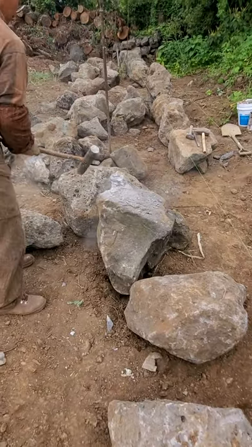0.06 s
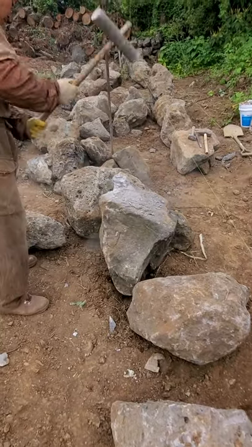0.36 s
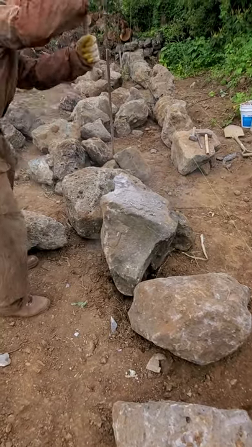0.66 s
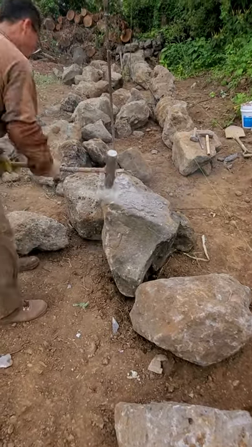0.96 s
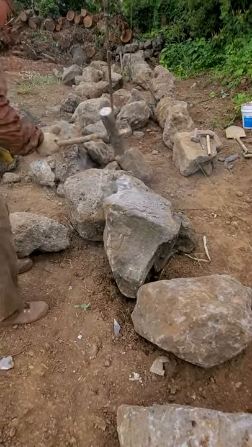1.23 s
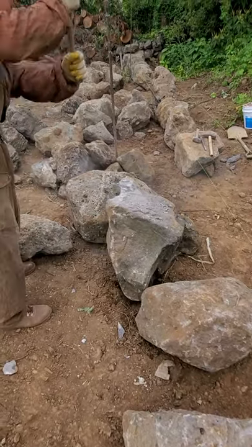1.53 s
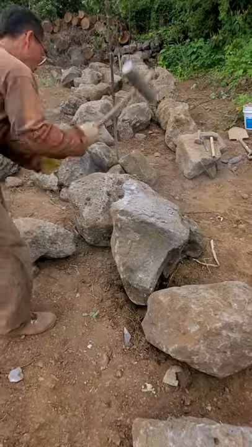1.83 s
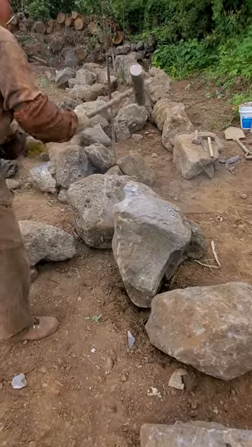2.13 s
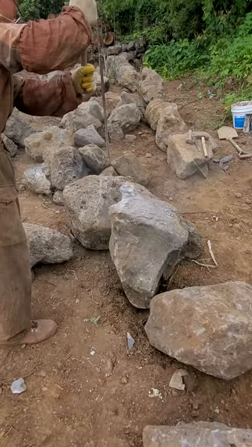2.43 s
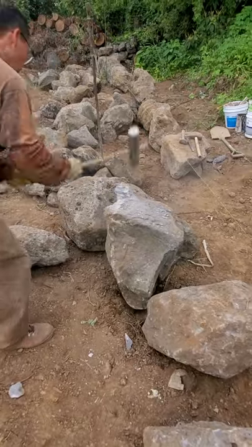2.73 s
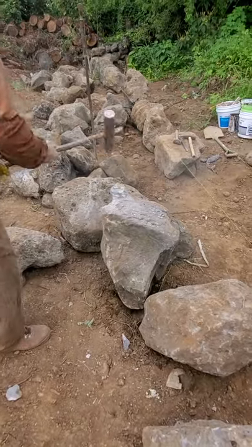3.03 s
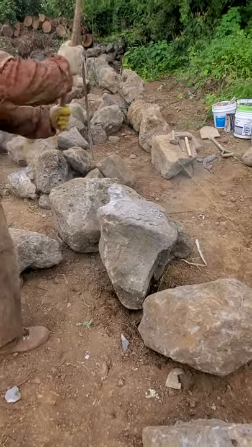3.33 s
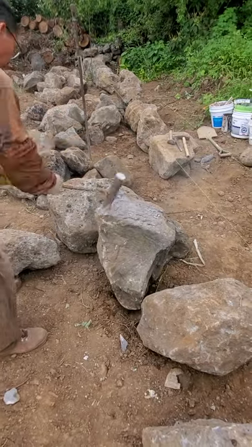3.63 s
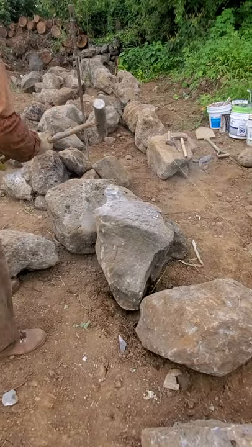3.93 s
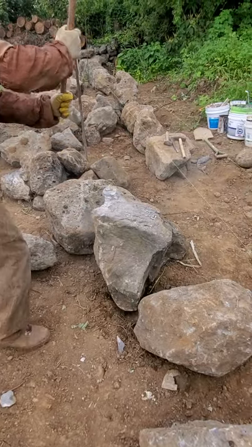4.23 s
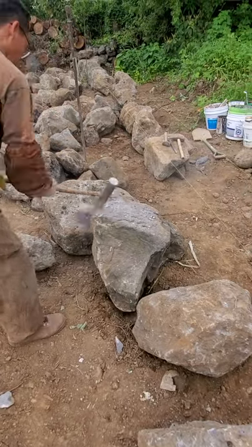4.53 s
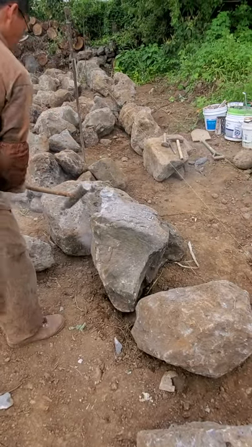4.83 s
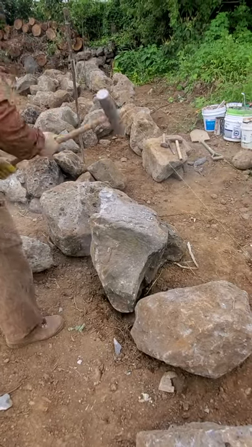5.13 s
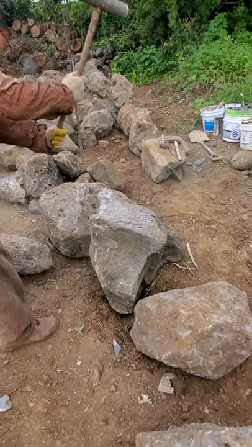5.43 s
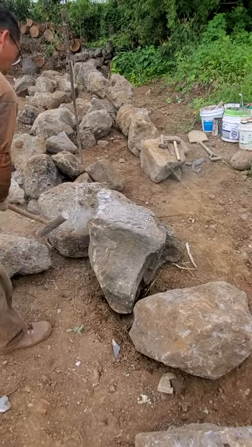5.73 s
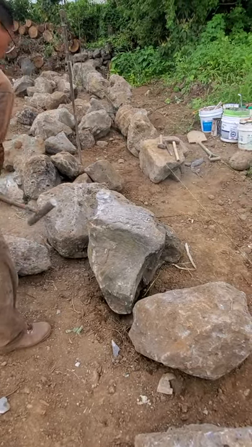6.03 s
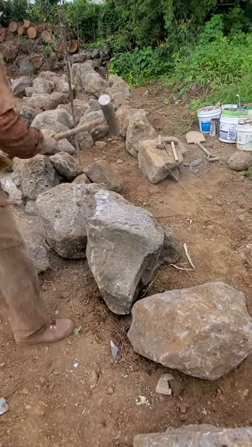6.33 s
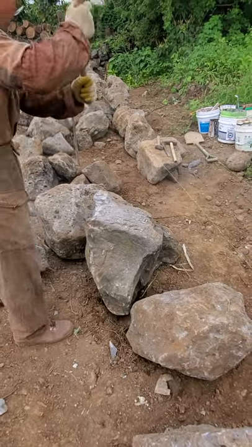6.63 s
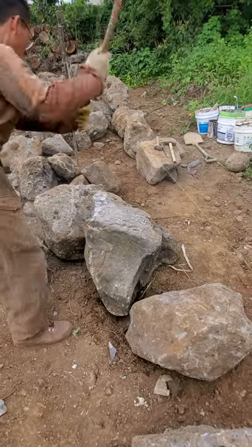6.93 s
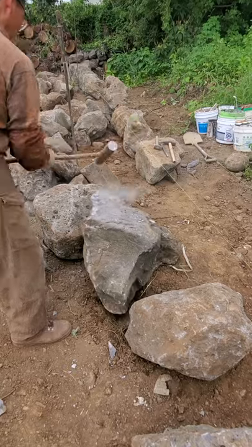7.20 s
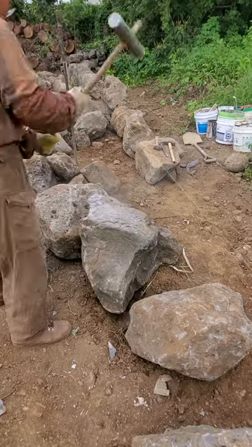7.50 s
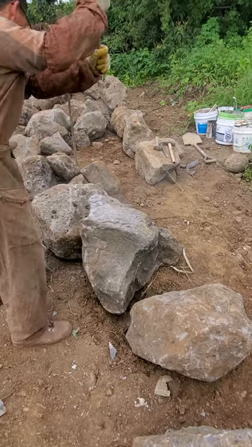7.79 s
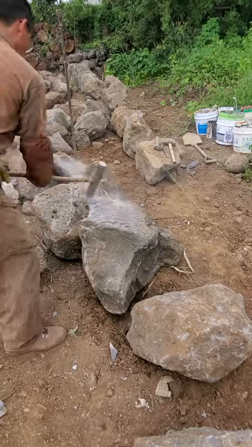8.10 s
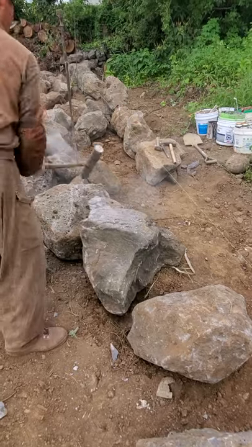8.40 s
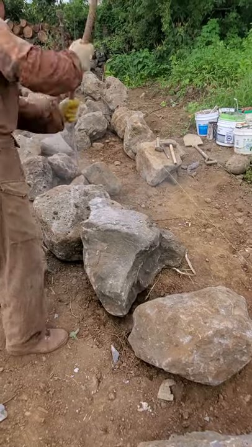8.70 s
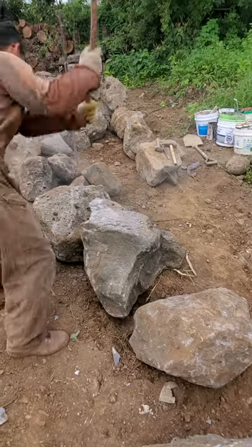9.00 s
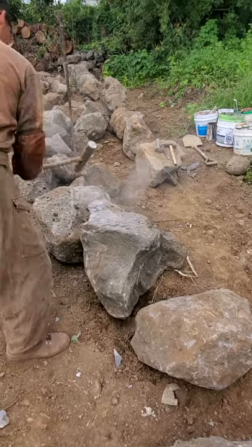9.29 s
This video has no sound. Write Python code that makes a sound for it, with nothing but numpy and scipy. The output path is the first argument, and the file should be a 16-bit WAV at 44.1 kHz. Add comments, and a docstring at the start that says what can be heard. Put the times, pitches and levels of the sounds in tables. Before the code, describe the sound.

Steady metallic hammer blows crack against stone and echo around a yard, while chips patter down over a low, far engine hum.

```python
"""A yard between two walls, stereo microphone near a boulder, an engine rumbling in the distance. At first
stone chips and grit are still falling. From one second in, a sledgehammer strikes a hand-held steel chisel nine
times: the boulder thuds and cracks, the steel rings, the walls throw the sound back and forth, and grit patters
down. Between swings clothes rustle, boots shift on the dirt and a far bird whistles faintly. Toward the end the
grit falls louder and the engine's hum grows louder."""
import sys
import numpy as np
from scipy import signal
from scipy.fft import rfft, irfft, next_fast_len
from scipy.io import wavfile

SR = 44100
rng = np.random.default_rng(int(sys.argv[2]) if len(sys.argv) > 2 else 0)


def inscribe(sig):
    """Save sig as 16-bit PCM at rate SR to the path in sys.argv[1].

    A 1-D sig is mono; a 2-D sig holds one channel per row.
    Samples are clipped to [-1, 1] before scaling.
    """
    pcm = np.round(np.clip(np.atleast_2d(sig).T, -1, 1) * 32767)
    wavfile.write(sys.argv[1], SR, pcm.astype(np.int16))


N = 412335
TIME = np.arange(N) / SR

# the far engine's hum level, rising unevenly: (time [s], hum level [dB])
HUM_LEVEL = [(0.0, -65), (0.68, -74), (1.07, -57), (2.42, -70.5), (7.37, -46), (7.6, -49.5),
             (8.28, -47), (8.39, -48), (9.35, -48)]
# spectra of low rumble, distant traffic and airy hiss: (frequency [Hz], level [dB])
RUMBLE_SPECTRUM = [(20, -16.5), (32, -14), (48, -2.5), (64, 0.5), (80, -1.5), (105, -3), (150, -11.5),
                   (260, -15.5), (600, -60)]
TRAFFIC_SPECTRUM = [(90, -6), (170, 4), (280, 4.5), (450, -1), (1000, -3), (1500, -7.5), (2000, -17.5),
                    (2700, -29.5), (4500, -42)]
AIR_SPECTRUM = [(1500, -3.5), (3000, 14), (4800, 4), (6200, 11.5), (7500, 2), (12000, -6), (16000, -14)]
# a far bird: (time [s], length [s], first pitch [Hz], last pitch [Hz], level [dB])
BIRD_CALLS = [(1.42, 0.069, 5240, 3800, -71), (6.42, 0.26, 3650, 3790, -80), (6.68, .2, 4090, 4660, -79),
              (7.59, 0.056, 5120, 3800, -62)]
# spectra of the wall echoes and of the scatter from rocks and trees: (frequency [Hz], level [dB])
WALL_SPECTRUM = [(100, -8.5), (300, -12), (600, -1.5), (1300, 0), (2100, -5), (3000, 2), (6000, -6),
                 (10000, -6), (16000, -17.5)]
SCATTER_SPECTRUM = [(100, 1), (300, -12.5), (600, -7.5), (1300, -5), (3000, -5), (6000, -4.5), (10000, -9),
                    (16000, -2)]
# single reflections from the ground and from nearby rocks: (delay [s], level [dB], left minus right [dB])
NEAR_REFLECTIONS = [(.0075, -10, -3), (0.058, -26, -4.5), (0.08, -26.5, -3)]
# the body shifting between swings, and boots scuffing: (time [s], half-width [s], level [dB])
BODY_SHIFTS = [(0.106, 0.34, -52.5), (5.55, 0.033, -49.5), (6.758, 0.071, -43.5), (7.465, 0.086, -46)]
BOOT_SCUFFS = [(1.582, 0.019, -50), (6.344, 0.013, -51)]
# spectra of work clothes, scuffed dirt and falling grit: (frequency [Hz], level [dB])
CLOTH_SPECTRUM = [(100, -11), (200, 5.5), (300, 6.5), (500, -2.5), (900, -10.5), (2000, -20), (6000, -60),
                  (16000, -58)]
SCUFF_SPECTRUM = [(200, 6), (700, 3.5), (1800, 2), (2500, -8), (3600, -19), (16000, -43)]
GRIT_SPECTRUM = [(400, -11), (1200, -0.5), (3000, -1.5), (8000, -3.5), (12000, -7.5), (16000, -9.5)]
# boots and lumps landing on the dirt: (time [s], level [dB])
DIRT_LANDINGS = [(0.068, -30.5), (0.151, -42), (0.192, -41), (0.502, -43.5), (5.219, -32.5), (5.233, -35.5),
                 (7.543, -43.5), (7.568, -39.5)]
# larger chips landing: (time [s], pitch [Hz], level [dB], contact hardness [dB])
CHIP_LANDINGS = [(0.0222, 1680, -28.5, -5), (0.0683, 1280, -33, 3), (0.1446, 2150, -42, 7),
                 (0.168, 1650, -37, 9), (0.172, 1304, -37.5, 12), (0.2116, 1047, -37, -11),
                 (0.2769, 1427, -35, -30), (0.3006, 1900, -52.5, 3), (0.3406, 1740, -52.5, 7),
                 (0.4688, 1388, -40, -16.5), (0.537, 1767, -62.5, 1), (4.787, 1110, -53, 10),
                 (4.824, 1367, -55.5, 10.5), (4.8674, 935, -31, -6), (4.892, 1170, -35.5, 6),
                 (5.1407, 965, -68.5, 17.5), (5.263, 1480, -51.5, -5.5), (5.861, 1750, -54.5, 11),
                 (5.927, 1330, -44, 3), (7.6742, 1860, -46.5, 15.5), (8.489, 1160, -73, 24),
                 (8.8895, 1243, -57.5, -0.5)]
# resonances of a chip's body: (multiple of its pitch [ratio], width [Hz], level [dB])
CHIP_BODY_MODES = [(.6, 366, -2.5), (0.949, 220, -2), (1.251, 262, -2)]
# resonances of a chip's clack and tick, and of the dirt: (frequency [Hz], width [Hz], level [dB])
CHIP_CLACK_MODES = [(2830, 680, -5), (3750, 1500, -5), (5325, 220, -4)]
CHIP_TICK_MODES = [(6450, 4500, 0.5), (8900, 1200, -6.5), (13200, 1900, -6.5)]
DIRT_MODES = [(150, 46, 2), (277.6, 98.5, 0), (405, 250, -12.5)]
# modes of hammer head and chisel: (voice, frequency [Hz], level [dB], t60 [s], share of the voice's
# level [ratio], share of the force [ratio], swell as the head turns [dB], left minus right [dB])
STEEL_MODES = [("clang", 3390, -19.5, .17, 1, 0, 0, -5.5), ("ping", 4216, -26.5, 0.11, .25, .05, 3, -.5),
               ("ring", 6515, -57.5, 1.3, 0.33, .65, 10.5, -7), ("ping", 8578, -41, .21, 0.99, .15, 21, -1),
               ("ring", 8700, -53, .2, .7, .3, -1.5, 2.5), ("ring", 9878, -47, 0.55, 0.98, .5, 20.4, 2.4)]
# resonances of the boulder under the chisel, low to high: (frequency [Hz], width [Hz], level [dB])
THUD_MODES = [(239, 17, 2), (265.8, 23, 2.5), (315.6, 69, -7.5)]
KNOCK_MODES = [(406, 100, -4.5), (565, 110, 0), (730, 200, -1.5), (1010, 470, -1.5)]
CRACK_MODES = [(1315, 330, 1.5), (1610, 130, -1), (2008, 150, 1), (2720, 680, -7.5), (3450, 1200, -3)]
SPLINTER_MODES = [(4800, 530, -1), (6190, 240, 4.5), (8240, 550, -8.5), (11600, 4100, -13),
                  (14000, 2000, -14)]
# hammer blows; force and the steel's three voices (set by where the head meets the chisel) are
# relative to a usual blow:
# (time [s], force [dB], thud [dB], knock [dB], crack centre [Hz], clang [dB], ping [dB], ring [dB])
HAMMER_BLOWS = [(0.9690, -15.5, -15, -24, 1716, 5.5, -1.5, -1.5),
                (1.9495, 2.5, -17, -24.5, 1870, -2.5, 0, 3.5),
                (2.8177, -2, -16, -18, 1750, -25.5, -0.5, -14),
                (3.6893, -3.5, -18.5, -18.5, 1940, -0.5, -20.5, -7),
                (4.578, -4.5, -24, -16.5, 2220, 7.5, 3, 3), (5.681, -2, -27, -23.5, 2180, -2.5, 8.5, -2.5),
                (7.124, 5, -16, -21, 1750, -4, 1, 14), (8.114, 4, -18.5, -24.5, 1520, 4.5, 8.5, 3.5),
                (9.194, 3, -20, -27, 2066, -4.5, 18, -7.5)]


def from_db(db):
    """Decibels to gain."""
    return 10 ** (np.asarray(db) / 20)


def rms_one(x):
    """Scale to rms 1."""
    return x / np.sqrt(np.mean(x ** 2) + 1e-20)


def pan(db):
    """Channel gains for a level difference, left minus right."""
    return rms_one(from_db([[db / 2], [-db / 2]]))


def add(out, s, sound):
    """Mix a sound in at s seconds."""
    at = max(0, round(s * SR))
    out[:, at:at + sound.shape[-1]] += sound[..., :N - at]


def swell(s, half_width_s, db):
    """A bell-shaped rise and fall in level, peaking at s seconds."""
    return from_db(db) * np.exp(-((TIME - s) / half_width_s) ** 2 / 2)


def colour(x, spectrum):
    """Filter by a curve of (frequency [Hz], level [dB])."""
    hz, db = np.transpose(spectrum)
    size = next_fast_len(x.shape[-1])
    grid = np.maximum(np.fft.rfftfreq(size, 1 / SR), 1)
    gain = from_db(np.interp(np.log(grid), np.log(hz), db))
    return irfft(rfft(x, size) * gain, size)[..., :x.shape[-1]]


def stereo_noise(size, width):
    """White noise; width 0 is the same in both channels, 1 unrelated."""
    mid, side = rng.standard_normal((2, size))
    return mid + width * side * np.array([[1], [-1]])


def noise_bed(spectrum, width):
    """Steady coloured stereo noise at rms 1."""
    return rms_one(colour(stereo_noise(N, width), spectrum))


def resonate(x, modes, pitch=1):
    """Parallel resonances with alternating signs."""
    out = 0
    for k, (hz, width, db) in enumerate(modes):
        radius = np.exp(-np.pi * width / SR)
        angle = 2 * np.pi * min(hz * pitch / SR, .45)
        ringing = signal.lfilter([1, 0, -1], [1, -2 * radius * np.cos(angle), radius ** 2], x)
        out = out + (-1) ** k * from_db(db) * (1 - radius ** 2) * ringing
    return out


def burst_at(sound, db):
    """Give a short sound the energy of 20 ms at an rms level of db."""
    return from_db(db) * rms_one(sound) * np.sqrt(.02 * SR / sound.shape[-1])


def background(hum_hz=80.38, hum_width_hz=1.3, shudder_db=-25, shudder_s=0.18):
    """A far engine hums over rumble, distant traffic and faint air; the ground shudders at each thud."""
    hum_db = np.interp(TIME, *np.transpose(HUM_LEVEL))
    hum_swing_db = hum_db - hum_db.mean()   # rumble and traffic rise with the engine
    thuds = np.zeros(N)
    for s, _, thud_db, *_ in HAMMER_BLOWS:
        thuds[round(s * SR)] = from_db(thud_db + shudder_db)
    shudder = signal.lfilter([1], [1, -np.exp(-1 / (shudder_s * SR))], thuds)
    rumble = np.hypot(from_db(-53 + .38 * hum_swing_db), shudder) * noise_bed(RUMBLE_SPECTRUM, width=0.11)
    traffic = from_db(-56 + .25 * hum_swing_db) * noise_bed(TRAFFIC_SPECTRUM, width=0.55)
    air = from_db(-97) * noise_bed(AIR_SPECTRUM, width=1.0)
    band = [(hum_hz, hum_width_hz, 0)]
    wavering = resonate(resonate(rng.standard_normal(N + SR), band), band)[SR:]
    hum = from_db(hum_db) * rms_one(wavering)
    return (rumble + hum + traffic + air) * pan(-1.4)


def bird(waver_hz=110, waver_rate_hz=35):
    """Far from the microphone, a bird's thin gliding whistles waver and break up."""
    out = np.zeros((2, N))
    smooth = signal.butter(2, waver_rate_hz, fs=SR, output="sos")
    for s, length, first_hz, last_hz, db in BIRD_CALLS:
        size = int(length * SR)
        waver, strength = rms_one(signal.sosfilt(smooth, rng.standard_normal((2, SR))))[:, -size:]
        hz = np.linspace(first_hz, last_hz, size) + waver_hz * waver
        envelope = from_db(db) * np.sin(np.linspace(0, np.pi, size)) * strength
        add(out, s, envelope * np.sin(2 * np.pi * np.cumsum(hz) / SR))
    return out


def yard(x, first_echo_s=.0495, round_trip_s=.0535, trip_loss_db=7.5, smear_s=0.0067, scatter_t60=.66):
    """Sound flutters between two rough walls; the ground and nearby rocks reflect it once, trees add a diffuse
    tail."""
    t, echoes = TIME[:SR], 0
    flutter = [(first_echo_s + k * round_trip_s, -13 - k * trip_loss_db, -2) for k in range(4)]
    for delay, db, side_db in NEAR_REFLECTIONS + flutter:
        age = t - delay
        lead = np.where(age > 0, 1, from_db(-9))   # rocks in front of a wall answer early and weaker
        smear = np.exp(-abs(age) / smear_s) * lead
        echoes = echoes + from_db(db) * pan(side_db) * rms_one(smear * stereo_noise(SR, 0.24))
    build_up = 1 - np.exp(-t / 0.028)
    tail = rms_one(stereo_noise(SR, 0.62) * from_db(-60 * t / scatter_t60) * build_up)
    scatter = from_db(-13.5) * pan(-3.0) * colour(tail, SCATTER_SPECTRUM)
    response = (colour(echoes, WALL_SPECTRUM) + scatter) / np.sqrt(SR)
    return signal.fftconvolve(x, response[:, :SR * 9 // 10], axes=1)[:, :N]


def clothes(swing_lead_s=0.094, swing_half_width_s=0.15):
    """Heavy work clothes swish, a glove hisses along the shaft on each downswing and boots scuff."""
    swings = sum(swell(s - swing_lead_s, swing_half_width_s, force) for s, force, *_ in HAMMER_BLOWS)
    shifts = sum(swell(*shift) for shift in BODY_SHIFTS)
    swish = (shifts + from_db(-60) * swings) * noise_bed(CLOTH_SPECTRUM, width=0.17)
    hiss = (from_db(-32) * shifts + from_db(-74.5) * swings) * noise_bed(AIR_SPECTRUM, width=1.0)
    boots = sum(swell(*scuff) for scuff in BOOT_SCUFFS) * noise_bed(SCUFF_SPECTRUM, width=0.61)
    return (swish + hiss + boots) * pan(-6.0)


def grit(grains_per_s=450, size_db=5, flight_s=0.28, flight_spread=0.62, rise_db_per_s=2.5):
    """Grit thrown up by each blow patters down; the stone loosens, so each shower is louder."""
    showers = [(-0.36, -61)]   # one is already falling at the start
    showers += [(s, -84 + rise_db_per_s * s) for s, *_ in HAMMER_BLOWS]
    level = 0
    for s, db in showers:
        log_age = np.log(np.maximum(TIME - s, 1e-3) / flight_s)
        level = level + from_db(db) * np.exp(-(log_age / flight_spread) ** 2 / 2)
    landings = rng.random(N) < grains_per_s / SR
    grains = landings * from_db(size_db * np.minimum(rng.exponential(1, N), 4))
    rattle = signal.lfilter([1], [1, -np.exp(-1 / (0.0005 * SR))], grains + 1e-18)
    return level * rms_one(colour(rattle * stereo_noise(N, 1), GRIT_SPECTRUM))


def impact(modes, db, crush_s, width, top_hz, snap, detune=0.065, crumble_db=-24, crumble_s=.022):
    """Stone snaps, crushes for a moment and crumbles on faintly into its resonances."""
    t = TIME[:SR // 10]
    crush = t / crush_s * np.exp(1 - t / crush_s)
    crumble = from_db(crumble_db) * np.exp(-t / crumble_s)
    force = (crush + crumble) * stereo_noise(len(t), width)
    force[:, round(crush_s * SR / 2)] += snap * np.sqrt(crush_s * SR)   # the first sharp break
    force = signal.sosfilt(signal.butter(2, top_hz, fs=SR, output="sos"), force)
    pitch = np.exp(detune * rng.standard_normal())
    return burst_at(resonate(force, modes, pitch), db)


def chips():
    """Larger chips clatter onto the rocks; boots and lumps land dully on the dirt."""
    out = np.zeros((2, N))
    for s, hz, db, hard_db in CHIP_LANDINGS:
        body = [(multiple * hz, width, level) for multiple, width, level in CHIP_BODY_MODES]
        add(out, s, impact(body, db, crush_s=0.0011, width=0.58, top_hz=2580, snap=1.6))
        # a harder contact adds clack, and still more tick
        add(out, s, impact(CHIP_CLACK_MODES, db - 5.5 + 0.44 * hard_db,
                           crush_s=0.0017, width=1.0, top_hz=7070, snap=0.67, detune=0.082))
        add(out, s, impact(CHIP_TICK_MODES, db - 8 + hard_db,
                           crush_s=0.0019, width=1.0, top_hz=14000, snap=0.69, detune=0.093))
    for s, db in DIRT_LANDINGS:
        add(out, s, impact(DIRT_MODES, db, crush_s=.003, width=0.1, top_hz=596, snap=1.2, detune=0.099))
    return out * pan(-0.45)


def steel(turn_s=0.064, twin_db=-11, twin_spread_hz=11, jostle_depth=0.34, jostle_hz=45):
    """Steel rings on as the head rebounds and turns its loud side outward; close twin modes beat."""
    out = np.zeros((2, N))
    smooth = signal.butter(2, jostle_hz, fs=SR, output="sos")
    for s, force_db, *_, clang_db, ping_db, ring_db in HAMMER_BLOWS:
        voices = {"clang": clang_db, "ping": ping_db, "ring": ring_db}
        # the tools jostle in the hands, so the tones waver in phase and strength
        jostle = jostle_depth * rms_one(signal.sosfilt(smooth, rng.standard_normal((2, SR))))
        for voice, hz, usual_db, t60, voice_share, force_share, swell_db, side_db in STEEL_MODES:
            db = usual_db + voice_share * voices[voice] + force_share * force_db
            t = TIME[:min(SR, int(2 * t60 * SR))]
            phase, strength = jostle[:, :len(t)]
            twin_hz = hz + twin_spread_hz * rng.standard_normal()
            lead = np.array([[0], [rng.uniform(1.1, 2.1)]])   # it reaches the two capsules out of step
            tone = np.sin(2 * np.pi * hz * t + lead + phase) * (1 + strength)
            twin = from_db(twin_db) * np.sin(2 * np.pi * (twin_hz * t + rng.random((2, 1))))
            turned = 1 - np.exp(-t / turn_s)
            envelope = from_db(db - 60 * t / t60 + swell_db * turned)
            add(out, s, (tone + twin) * envelope * pan(side_db))
    return out


def thud(db, contact_s=0.0015):
    """The weight of the hammer shoves the boulder once and it booms briefly."""
    t = TIME[:SR // 8]
    push = -np.sin(np.pi * np.minimum(t / contact_s, 1))
    pitch = np.exp(0.069 * rng.standard_normal())
    return burst_at(sum(resonate(push, [mode], pitch) for mode in THUD_MODES), db)


def boulder(focus_db_per_octave=13):
    """Each blow drives the chisel in: a thud, and the stone breaks from low knock to bright splinter."""
    out = np.zeros((2, N))
    for s, force_db, thud_db, knock_db, centre_hz, *_ in HAMMER_BLOWS:
        add(out, s, thud(thud_db) * pan(-3.0))
        knock = impact(KNOCK_MODES, knock_db, crush_s=0.0012, width=0.56, top_hz=1410, snap=1.5)
        # where the chisel sits decides which resonances answer
        answering = [(hz, width, db - focus_db_per_octave * abs(np.log2(hz / centre_hz)))
                     for hz, width, db in CRACK_MODES]
        # a harder blow cracks a little louder and splinters more stone
        crack_db, splinter_db = -17 + 0.17 * force_db, -32 + force_db
        crack = impact(answering, crack_db, crush_s=.0015, width=0.71, top_hz=4900, snap=0.84)
        splinter = impact(SPLINTER_MODES, splinter_db, crush_s=.0014, width=1.0, top_hz=15100, snap=0.98)
        add(out, s, knock * pan(0.45) + crack * pan(-2.7) + splinter * pan(-2.5))
    return out


def from_left(x, lag_s=.00012):
    """The boulder lies left of the microphone, so its sound reaches the right capsule later."""
    lag = round(lag_s * SR)
    return np.array([x[0], np.pad(x[1], (lag, 0))[:N]])


def scene(steel_echo_db=-2):
    """At the microphone: the work and the bird, their echoes in the yard, clothes and the background."""
    direct = from_left(boulder() + chips()) + grit() + bird()
    ringing = steel()
    echoes = yard(direct + from_db(steel_echo_db) * ringing)   # steel reaches the walls more weakly
    return direct + ringing + echoes + clothes() + background()


def record(dry, stopband_hz=17300):
    """The recorder rounds off the highest peaks and cuts the top of the treble."""
    rounded = dry / (1 + dry ** 6) ** (1 / 6)
    return signal.sosfilt(signal.cheby2(14, 70, stopband_hz, fs=SR, output="sos"), rounded)


dry = scene()
out = record(dry)
inscribe(out)
```